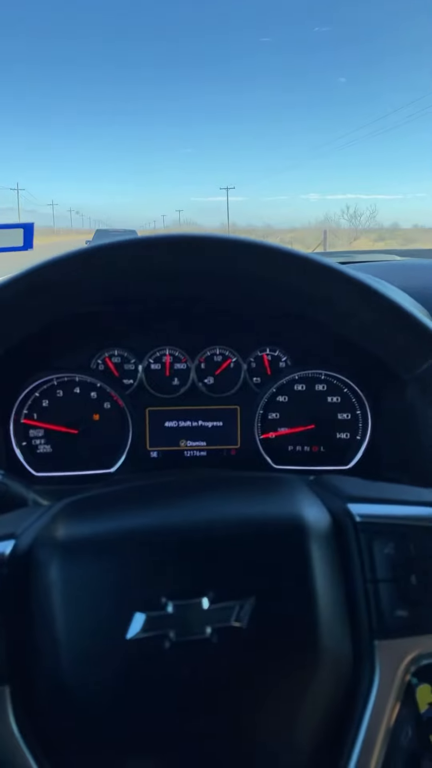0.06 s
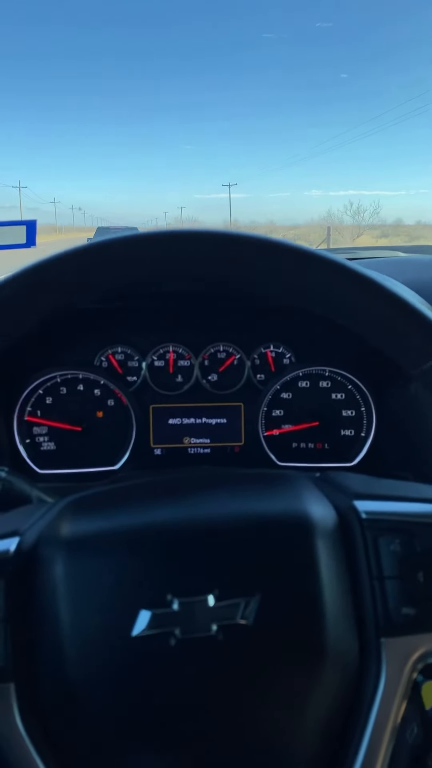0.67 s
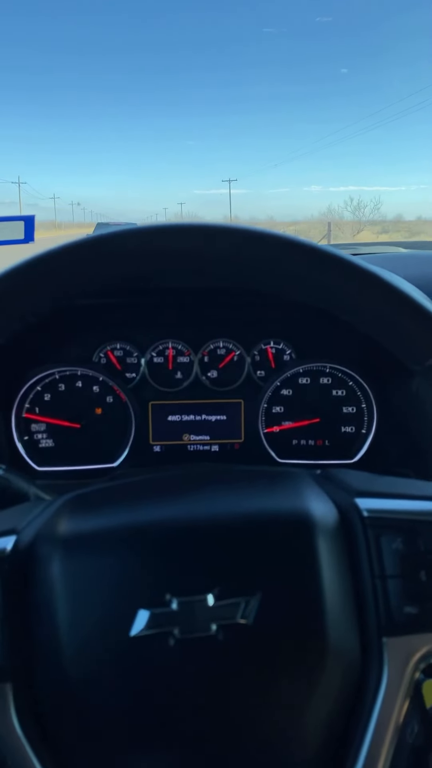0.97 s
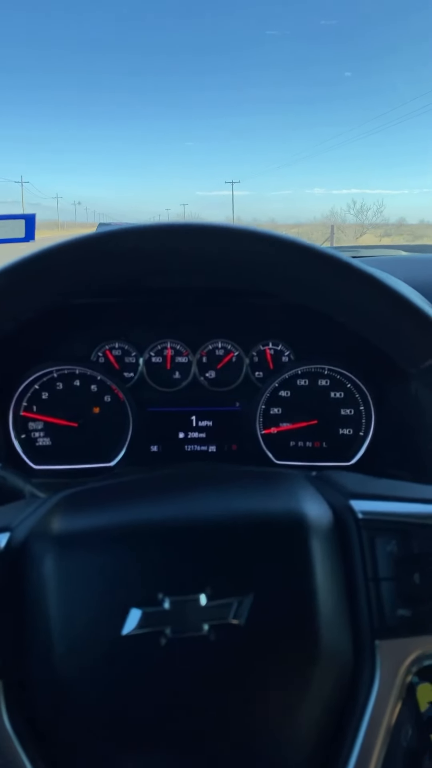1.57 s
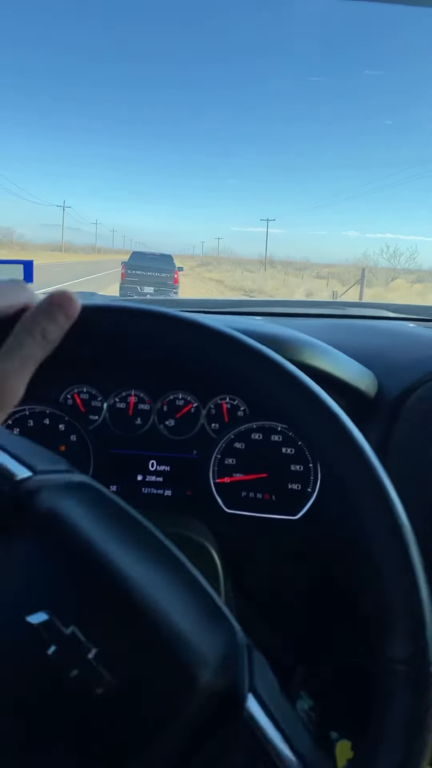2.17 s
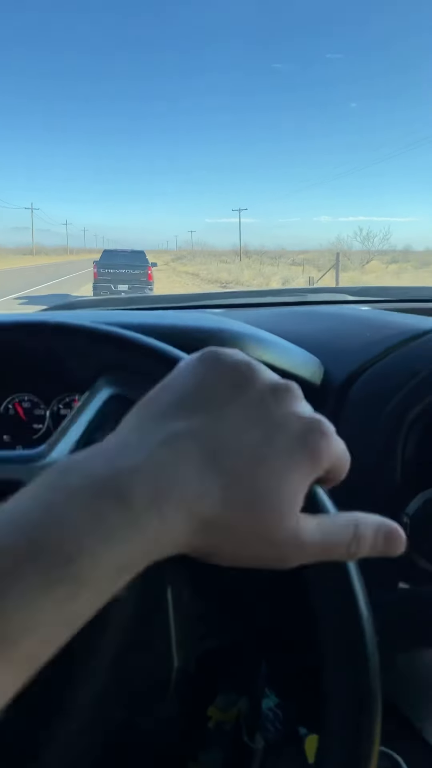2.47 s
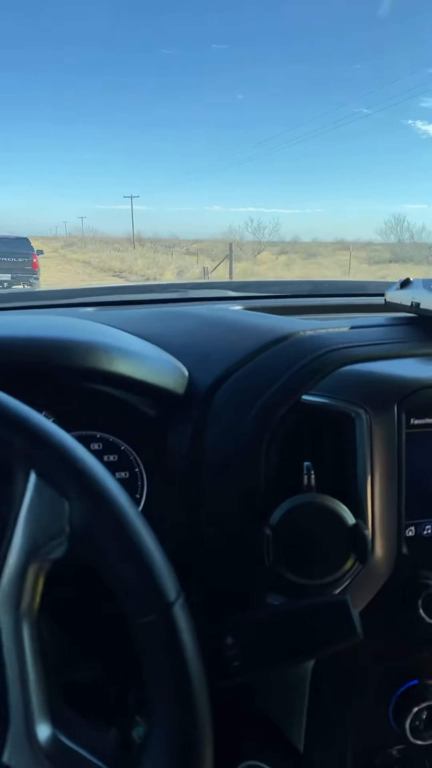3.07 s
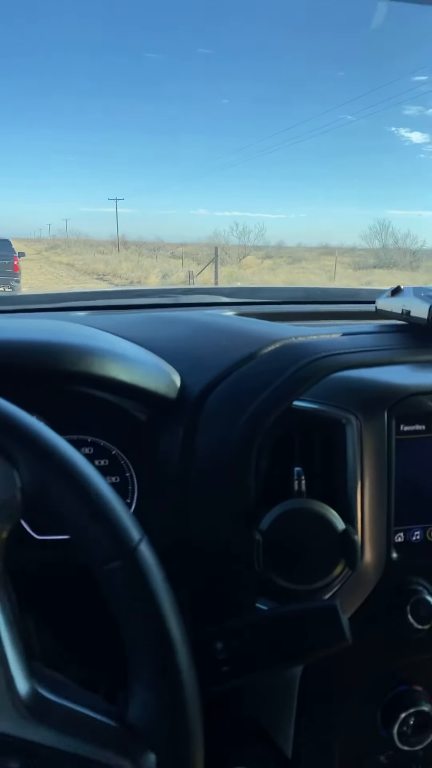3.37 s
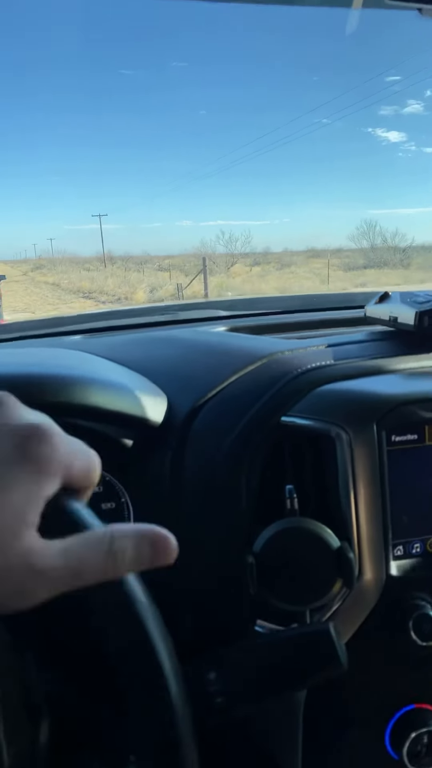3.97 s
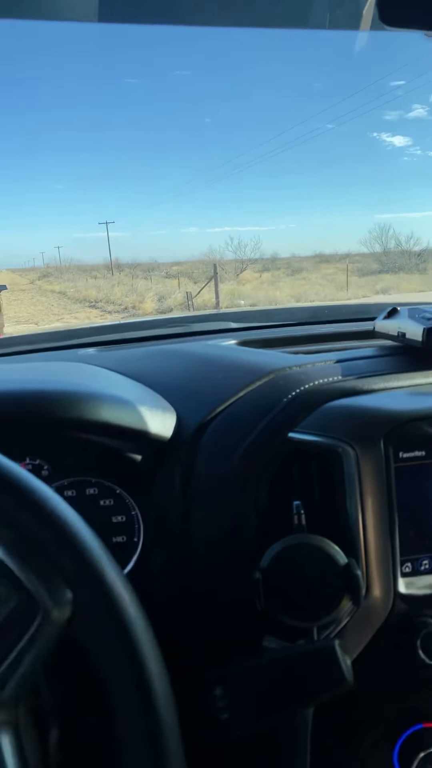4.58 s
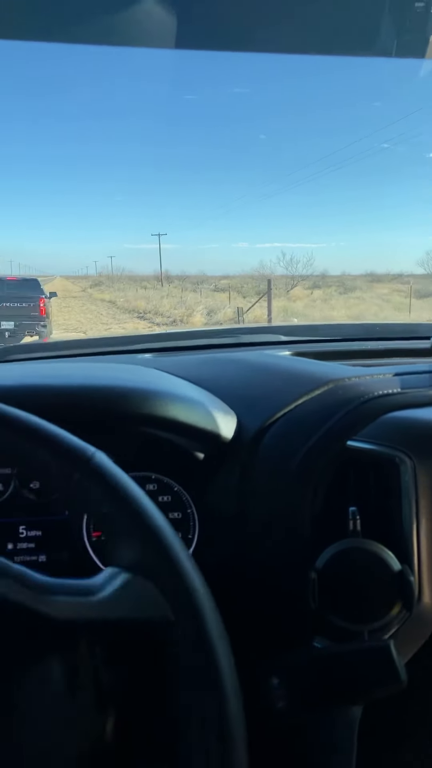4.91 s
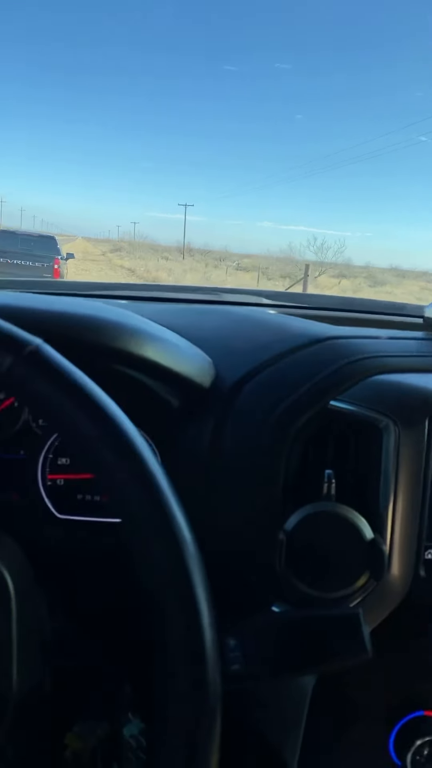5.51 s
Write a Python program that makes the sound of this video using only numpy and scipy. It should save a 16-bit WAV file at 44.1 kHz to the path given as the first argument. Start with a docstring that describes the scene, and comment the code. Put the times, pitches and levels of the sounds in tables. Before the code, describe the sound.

A deep V8 exhaust rumble fills a pickup's cab, heard from the driver's seat. After a moment of idling come a few quick, rattling gear clunks, and the truck pulls away slowly on a dirt road, its drone climbing and growing louder before the revs drop a little. Hands brush softly over the wheel, the trim ticks and squeaks faintly over quiet vent air, and a light bump comes near the end.

```python
"""A V8 pickup's loud exhaust, heard inside the cab on a dirt road. The engine idles, the driveline
clunks into gear, the truck pulls round a slow turn and eases off. Crank speed sets the pitch and
loudness of the orders that sweep through the boom of the cab. Tyres roll over grit and ruts, a vent
blows, hands slide on the steering wheel, the trim ticks and squeaks."""
import sys
import numpy as np
from scipy import signal
from scipy.fft import rfft, irfft, next_fast_len
from scipy.io import wavfile
from scipy.ndimage import uniform_filter1d

SR = 44100
rng = np.random.default_rng(int(sys.argv[2]) if len(sys.argv) > 2 else 0)


def dump_mix(stems):
    """Bounce the given channels to the path in sys.argv[1] as a 16-bit WAV at rate SR."""
    frames = np.atleast_2d(stems).T  # one column per channel
    limited = np.clip(frames, -1, 1)  # hard clip at full scale
    pcm = np.round(limited * 32767).astype(np.int16)
    wavfile.write(sys.argv[1], SR, pcm)


N = 249165


def undb(db):
    """Decibels to gain."""
    return 10 ** (np.asarray(db) / 20)


def unit(x):
    """Scale to rms 1."""
    return x / np.sqrt(np.mean(x ** 2))


def curve(table):
    """Interpolate (seconds, value) rows per sample."""
    return np.interp(np.arange(N) / SR, *np.transpose(table))


def noise():
    """White noise."""
    return rng.standard_normal(N)


def walk(rate_hz):
    """Smooth random drift, spread near 1."""
    hold = int(SR / rate_hz)
    steps = rng.standard_normal(2000)[np.arange(N) // hold % 2000]
    return 1.3 * uniform_filter1d(uniform_filter1d(steps, hold), hold)


def colour(x, points):
    """Minimum-phase filter through (Hz, dB) points; its peaks ring on."""
    size = 2 * next_fast_len(N)
    hz, db = np.transpose(points)
    bins_hz = np.maximum(np.fft.rfftfreq(size, 1 / SR), 1)
    gain = undb(np.interp(np.log(bins_hz), np.log(hz), db))
    cepstrum = irfft(np.log(gain))
    cepstrum[1:size // 2] *= 2
    cepstrum[size // 2 + 1:] = 0
    return irfft(rfft(x, size) * np.exp(rfft(cepstrum)))[:N]


def band_noise(hz, width_hz, size=N):
    """Noise in one steep-sided resonance, rms 1."""
    bins_hz = np.maximum(np.fft.rfftfreq(size, 1 / SR), 1)
    detune = (bins_hz / hz - hz / bins_hz) * hz / width_hz
    return unit(irfft(rfft(rng.standard_normal(size)) / (1 + detune ** 2), size))


def fade(t, t60_s):
    """Exponential decay."""
    return np.exp(-np.log(1000) * t / t60_s)


def ring(modes, t):
    """Decaying (Hz, relative dB, t60 s) modes of a struck body; each blow differs a little."""
    hz, db, t60_s = np.transpose(modes)[:, :, None]
    hz = hz * (1 + 0.013 * rng.standard_normal(hz.shape))
    sign = rng.choice([-1, 1], hz.shape)
    partials = sign * undb(db) * fade(t, t60_s) * np.sin(2 * np.pi * hz * t)
    return partials.sum(axis=0) / np.linalg.norm(undb(db))


def swells(events):
    """Gain of (centre s, length s, dB) Gaussian swells, summed in power."""
    t = np.arange(N) / SR
    power = sum(undb(db) ** 2 * np.exp(-np.minimum((2 * (t - centre_s) / length_s) ** 2, 60))
                for centre_s, length_s, db in events)
    return np.sqrt(power)


def add(out, start_s, sound):
    """Mix a sound in at start_s."""
    i = max(int(start_s * SR), 0)
    out[i:i + len(sound)] += sound[:max(N - i, 0)]


def road_speed(move_off_s=0.94, gather_s=2.8):
    """Ramp from standstill (0) to a steady crawl (1)."""
    return np.clip((np.arange(N) / SR - move_off_s) / gather_s, 0, 1)


def exhaust(cycles, cycle_hz, gain_db):
    """Eight firings a cycle, shared unevenly by two banks, boom in the cab."""
    # Each row: multiple of the cycle rate, idle level in dB, loaded level in dB.
    orders = [(5, -33, -26), (6, -30, -27), (7, -26, -17), (8, -10, 0), (9, -33, -20), (10, -33, -20),
              (11, -9, -4), (12, -16, -19), (13, -1, -8), (14, -15, -9), (15, -10, -8), (16, 6, 2),
              (17, -14, -10), (18, -16, -16), (19, 0, -7), (20, -17, -13), (21, -2.5, -5), (22, -8, -8),
              (23, -5, -10), (24, 1.5, -8), (25, -6, -14), (26, -16, -12), (27, 0, -9), (28, -7, -8),
              (29, 0, -8), (30, -8, -8), (32, -1, -3), (34, -7, -8), (35, -3, -5), (37, -3, -7)]
    # Exhaust and cab resonances. Each row: frequency in Hz, gain in dB.
    boom = [(30.0, -17.1), (44.0, -16.2), (53.0, -4.1), (62.0, 0.0), (74.0, -9.2), (83.0, -22.7),
            (94.0, -8.5), (104.0, -4.3), (116.0, -10.3), (133.0, -5.8), (142.0, -11.7), (151.0, -21.2),
            (166.0, -17.8), (185.0, -32.1), (320.0, -44.1)]
    load = np.interp(cycle_hz, [5, 7.2], [0, 1])
    far_bank = np.array([1, 0, 1, 0, 0, 1, 0, 1])
    arrival_cycles = np.arange(8) / 8 + .01 * far_bank  # one bank's pulses arrive late
    pulses = 0
    for order, idle_db, load_db in orders:
        db = idle_db + load * (load_db - idle_db) + walk(6)
        phase_rad = np.angle(np.sum(np.exp(-2j * np.pi * order * arrival_cycles)))
        pulses += undb(db) * np.cos(2 * np.pi * order * cycles + phase_rad)
    # No two firings burn alike: noise between the orders, most off load.
    scatter = undb(-7 - 8 * load) * band_noise(120, 170)
    return colour((np.sqrt(2) * pulses + scatter) * undb(gain_db), boom)


def clatter_and_tyres(cycles, rev_octaves, idle_db=-59, tyre_db=-54, grit_db=-13, stones_per_s=130):
    """Engine clatter throbs with the firings and grows with revs; tyres rumble and crunch grit."""
    # Each row: frequency in Hz, gain in dB.
    spectrum = [(100, -0.5), (200, -0.5), (245, 0), (300, -1.5), (345, -5.5), (445, -6.5), (542, -9),
                (650, -11), (800, -12.5), (1040, -17.5), (1500, -25.5), (2230, -28), (5000, -41.5),
                (9000, -52)]
    clatter = noise() * (1 + 0.16 * np.cos(2 * np.pi * 8 * cycles))
    hits = rng.random(N) < stones_per_s / SR
    hit_db = 5 * np.minimum(rng.exponential(size=N), 4)
    grit = hits * undb(hit_db) * rng.choice([-1, 1], N)
    texture = unit(colour(clatter + undb(grit_db) * unit(grit), spectrum))
    gain = np.hypot(undb(idle_db + 2.5 * rev_octaves), undb(tyre_db) * road_speed())
    return texture * gain * undb(walk(18))


def vent(rush_db=-68, hiss_db=-74):
    """Steady dashboard air: a hollow rush and a smooth hiss."""
    # Each row of both: frequency in Hz, gain in dB.
    rush_spectrum = [(120, -19), (195, -6.5), (250, 6), (285, 0.5), (315, -15), (355, -13.5), (450, -6.5),
                     (761, -15.5), (1540, -33), (2100, -27), (4000, -37.5), (15000, -38)]
    hiss_spectrum = [(700, -6.5), (1400, 2.5), (2400, -2), (5000, -3.5), (7700, -4.5), (8500, -8),
                     (16000, -17)]
    rush = unit(colour(noise(), rush_spectrum)) * undb(rush_db)
    hiss = unit(colour(noise(), hiss_spectrum)) * undb(hiss_db)
    return rush + hiss


def body_sway(rumble_db=-57, shudder_db=2.5, waver_db=2):
    """The dirt road rocks the body and rings the floor panels; ruts make them shudder."""
    # Each row: centre in Hz, width in Hz, level in dB at full crawl.
    panel_bands = [(347.4, 45, -60), (540, 73, -67), (739, 100, -66)]
    # Each row: centre in seconds, length in seconds, level in dB.
    ruts = [(4.004, .1, -52.5), (4.14, 0.089, -52.5), (4.3, 0.21, -56.5), (5.268, 0.1, -43),
            (5.543, 0.35, -54)]
    # Each row: frequency in Hz, gain in dB.
    rut_spectrum = [(120, -6.5), (245, 0), (345, -3), (420, -6), (560, -10), (900, -13.5), (1300, -21.5),
                    (3000, -31.5), (8000, -46.5)]
    rumble = band_noise(63, 28) * undb(rumble_db)
    panels = sum(band_noise(hz, width_hz) * undb(db + waver_db * walk(8))
                 for hz, width_hz, db in panel_bands)
    shudder = unit(colour(noise(), rut_spectrum)) * swells(ruts) * undb(shudder_db * walk(50))
    return (rumble + panels) * road_speed() + shudder


def trim_chatter(taps_per_s=7, gain_db=-62, t60_s=0.091):
    """Loose trim taps faintly at random, harder with road speed."""
    taps = (rng.random(N) < taps_per_s / SR) * rng.random(N) * road_speed() ** 2
    envelope = signal.fftconvolve(taps, fade(np.arange(SR // 4) / SR, t60_s))[:N]
    return undb(gain_db) * envelope * band_noise(1450, 1400)


def knocks_and_ticks():
    """Short decaying noise bursts: the clack of the driveline clunks, and ticks in the trim."""
    # Each row: start in seconds, centre in Hz, width in Hz, level in dB, t60 in seconds.
    bursts = [(1.312, 400, 400, -53, .07), (1.373, 420, 560, -47, .12), (1.375, 4800, 5500, -50.5, .05),
              (1.416, 5800, 5500, -61, .037), (1.881, 850, 1800, -53, .06), (3.919, 650, 600, -51.5, .03),
              (4.324, 5800, 3200, -56, .095), (5.218, 3300, 3500, -54, .09),
              (5.334, 5700, 2800, -54.5, .073), (4.634, 1200, 1500, -57.5, .056),
              (4.77, 1400, 1400, -60, .07), (5.056, 1490, 1400, -55, .05), (3.036, 13400, 2400, -50, .013),
              (3.678, 9200, 1900, -49, .02)]
    out, t = np.zeros(N), np.arange(SR) / SR
    for start_s, hz, width_hz, db, t60_s in bursts:
        add(out, start_s, undb(db) * band_noise(hz, width_hz, len(t)) * fade(t, t60_s))
    return out


def driveline_clunks():
    """Gears take up their play: the body thuds, the gear case rings, small parts rattle."""
    # Each row: start in seconds, thud in dB, thud tilt in dB per octave, ring in dB, rattle in dB,
    # rattle t60 in seconds.
    clunks = [(1.372, -26, -18, -55, -54, .07), (1.626, -38, 0, -44, -35, .045),
              (1.630, -27.5, -3, -43.5, -41, .07), (1.881, -47, 0, -52, -47, .025),
              (5.272, -38, 5, -52, -58, .08)]
    # Each row of both: frequency in Hz, relative level in dB, t60 in seconds.
    body_modes = [(140, -3, .06), (176, 0, .06), (215, 2, .07), (245, -5, .05), (338, -5, .09)]
    case_modes = [(644, 6, 0.11), (720, 0, 0.036), (1187, 3, 0.1), (1610, 1, 0.07), (2213, -3, 0.038),
                  (2520, 9, 0.053), (3000, -31, 0.017), (3070, 5, 0.093), (3230, 8, 0.0089),
                  (4030, 0.5, 0.14), (4420, -6, .07), (5220, 12.5, 0.011)]
    # Each row: frequency in Hz, gain in dB.
    rattle_spectrum = [(300, 19.5), (700, -14), (1000, -19), (1700, -8), (2500, 2), (3200, 1), (4200, -1),
                       (5500, -15), (7800, -14), (9000, -54), (15000, -60)]
    blows, rattle_gain = np.zeros(N), np.zeros(N)
    t = np.arange(SR // 4) / SR
    for start_s, thud_db, tilt_db_per_octave, ring_db, rattle_db, rattle_t60_s in clunks:
        tilted = [(hz, db + tilt_db_per_octave * np.log2(hz), t60_s) for hz, db, t60_s in body_modes]
        add(blows, start_s, undb(thud_db) * ring(tilted, t) + undb(ring_db) * ring(case_modes, t))
        add(rattle_gain, start_s, undb(rattle_db) * fade(t, rattle_t60_s))
    return blows + rattle_gain * unit(colour(noise(), rattle_spectrum))


def hands_on_wheel(grain_db=0.9, split_hz=4200):
    """Skin and cloth slide over the wheel with a grainy hiss, some strokes brighter."""
    # Each row: centre in seconds, length in seconds, level in dB, extra treble in dB.
    strokes = [(1.528, 0.31, -65.5, -1), (1.887, 0.15, -67.5, 5.5), (2.096, .3, -68.5, 0.5),
               (2.413, 0.21, -61.5, -4.5), (2.617, 0.29, -69, 3), (3.663, 0.3, -69, 0),
               (4.25, 0.31, -68.5, 2), (4.698, 0.25, -67, -2.5), (5.152, 0.48, -62.5, -1),
               (5.567, 0.42, -65.5, -0.5)]
    # Each row: frequency in Hz, gain in dB.
    spectrum = [(700, -6), (1400, 3.5), (2400, -2.5), (3800, -2), (5000, -4), (7700, -5.5), (8500, -9.5),
                (12000, -15), (16000, -17.5)]
    hiss = unit(colour(noise() * undb(grain_db * walk(180)), spectrum))
    low = signal.sosfiltfilt(signal.butter(2, split_hz, fs=SR, output="sos"), hiss)
    low_gain = swells([(s, length_s, db) for s, length_s, db, _ in strokes])
    high_gain = swells([(s, length_s, db + treble_db) for s, length_s, db, treble_db in strokes])
    return low * low_gain + (hiss - low) * high_gain


def friction(centre_s, hz, width_hz, length_s, db, grip_db=1.8, grips_per_s=59):
    """A contact grips and slips in one resonance, swelling and fading."""
    resonance = band_noise(hz, width_hz, next_fast_len(N))[:N]
    return resonance * swells([(centre_s, length_s, db)]) * undb(grip_db * walk(grips_per_s))


def rubs_and_squeaks(rub_width_hz=170, squeak_width_ratio=.13):
    """The steering rubs as it turns; wheel and trim squeak briefly."""
    # Each row of both: centre in seconds, pitch in Hz, length in seconds, level in dB.
    rubs = [(2.22, 1310, 0.13, -68), (2.433, 1280, 0.099, -74), (3.34, 1165, .42, -70),
            (3.68, 1200, 0.13, -67.5), (4.014, 1235, 0.062, -58.5), (4.132, 1256, 0.068, -59.5),
            (4.44, 1240, 0.042, -67.5)]
    squeaks = [(4.137, 3420, .04, -70), (5.226, 3120, .018, -55), (5.479, 3180, .016, -60),
               (5.487, 900, .04, -56), (5.566, 860, .02, -59)]
    out = sum(friction(s, hz, rub_width_hz, length_s, db) for s, hz, length_s, db in rubs)
    out += sum(friction(s, hz, squeak_width_ratio * hz, length_s, db) for s, hz, length_s, db in squeaks)
    return out


def scene(idle_hz=4.7, exhaust_gain_db=-41.5, rise_db_per_octave=20):
    """The mix at the driver's seat, mono."""
    # Each row: time in seconds, four-stroke cycle rate in Hz.
    crank_speed = [(0, 4.77), (1.098, 4.661), (1.932, 4.737), (2.59, 6.56), (3.051, 8.695), (3.538, 9.531),
                   (4.459, 10.087), (4.664, 9.991), (5.096, 7.344), (5.39, 7.63), (5.65, 7.425)]
    # Effort sags as the gear takes hold, peaks pulling away, drops on lifting off.
    # Each row: time in seconds, exhaust gain in dB.
    effort = [(0, 0.55), (1.78, -2), (2.0, -6.5), (2.15, -0.4), (2.89, 2.5), (3.07, -0.5), (4.1, -1.7),
              (4.68, -3), (5.27, 2), (5.65, -2)]
    cycle_hz = curve(crank_speed)
    rev_octaves = np.log2(cycle_hz / idle_hz)
    gain_db = exhaust_gain_db + rise_db_per_octave * rev_octaves + curve(effort)
    cycles = .355 + np.cumsum(cycle_hz) / SR + .002 * walk(9)  # the crank drifts ahead and behind
    truck = exhaust(cycles, cycle_hz, gain_db) + clatter_and_tyres(cycles, rev_octaves)
    truck += body_sway() + driveline_clunks()
    cab = hands_on_wheel() + vent() + knocks_and_ticks() + rubs_and_squeaks() + trim_chatter()
    return (truck + cab)[None]


def record(dry):
    """Steep low-pass at 15.8 kHz."""
    return signal.sosfilt(signal.ellip(10, .2, 80, 15800, fs=SR, output="sos"), dry)


dry = scene()
out = record(dry)
dump_mix(out)
```